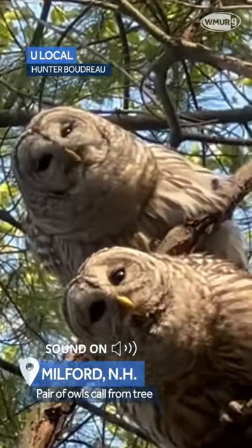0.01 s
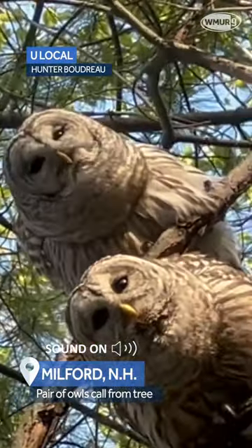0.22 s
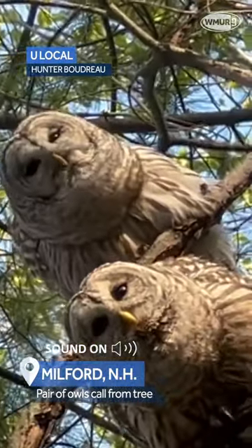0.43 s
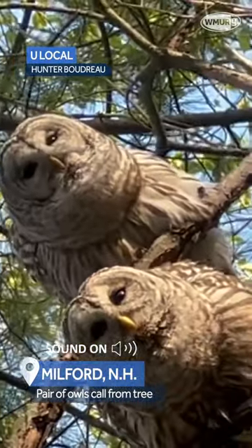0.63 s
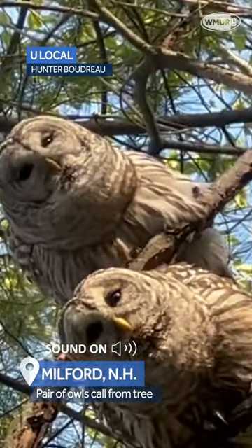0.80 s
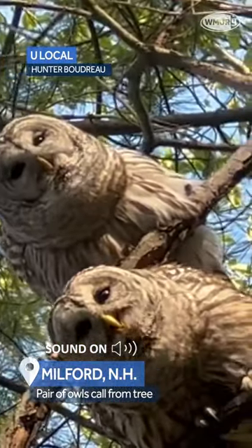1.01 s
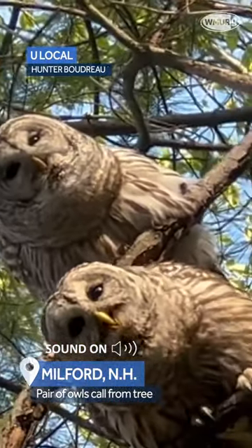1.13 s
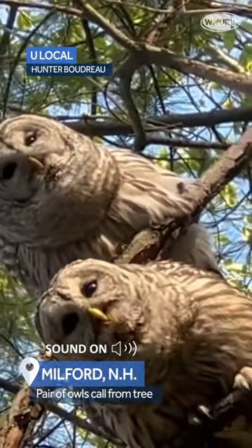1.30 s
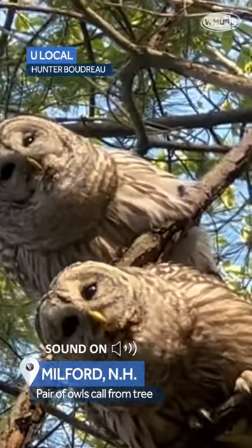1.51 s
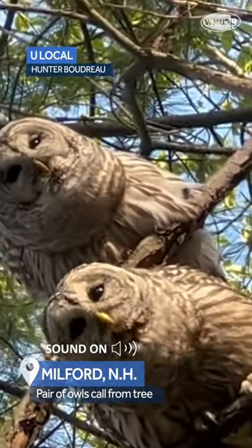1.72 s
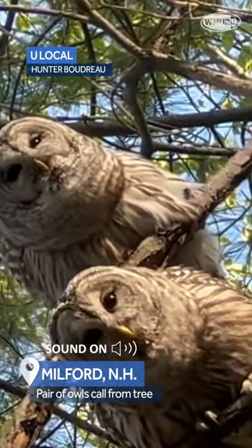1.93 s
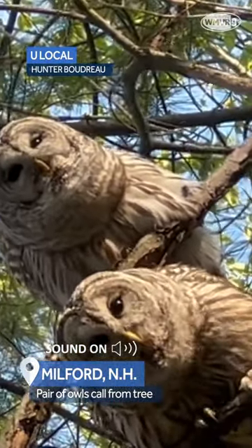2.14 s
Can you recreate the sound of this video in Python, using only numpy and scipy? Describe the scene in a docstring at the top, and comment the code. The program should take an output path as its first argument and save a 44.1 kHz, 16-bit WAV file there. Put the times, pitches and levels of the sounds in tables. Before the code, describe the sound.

Two barred owls call close by. From 0 a hollow, reedy call falls from about 650 Hz, quavering and loudest near 0.35, breaks lower around 0.5 and sinks away by 0.95. Gruff hoots arch at 0.5, 0.75, 1.2 and 1.65; a faint whine rises from 1.55, dropping into a hoot at 1.85, then a stronger overlapping pair at 2.0. Tiny click at 0.63, short tree echo, faint air.

```python
"""Two owls calling in the trees

Two barred owls call together, close by. A long, falling, quavering call breaks to a lower register, and a thin
whine rises and drops into a hoot: both are a sine fundamental with a fringe of overtones. Short gruff hoots
arch in pitch and sweep their harmonics through the throat resonance. Decaying noise scatters the calls among
the trees, over a few dry ticks, a click, a short low rumble and faint shaped-noise outdoor air."""
import sys
import numpy as np
from scipy import signal
from scipy.fft import rfft, irfft
from scipy.io import wavfile
from scipy.ndimage import uniform_filter1d

SR = 44100
rng = np.random.default_rng(int(sys.argv[2]) if len(sys.argv) > 2 else 0)


def generate_wav(signal):
    """Clip the signal to [-1, 1] and save it as 16-bit WAV at the path in sys.argv[1]."""
    frames = np.transpose(np.atleast_2d(signal))
    scaled = np.clip(frames, -1, 1) * 32767
    pcm = np.round(scaled).astype(np.int16)
    wavfile.write(sys.argv[1], SR, pcm)


N = 97020
T = np.arange(N) / SR
BIN_HZ = np.arange(N // 2 + 1) * SR / N
LEFT_RIGHT = np.array([[1], [-1]])  # sign of a difference signal in each channel


def undb(db):
    """Decibels to gain."""
    return 10 ** (np.asarray(db) / 20)


def curve_over_time(points):
    """Follow a (t/s, value) table with straight lines."""
    t, value = np.array(points).T
    return np.interp(T, t, value)


def gain_at(hz, points):
    """Gain of a (f/Hz, level/dB) curve, interpolated along log frequency."""
    f, db = np.array(points).T
    return undb(np.interp(np.log(np.maximum(hz, 1)), np.log(f), db))


def noise(shape):
    """Noise of rms 1 whose spectrum follows shape(Hz)."""
    x = irfft(rfft(rng.standard_normal(N)) * shape(BIN_HZ + 1), N)
    return x / x.std()


def band(hz, octaves):
    """Noise in a bell-shaped band."""
    return noise(lambda f: np.exp(-.5 * (np.log2(f / hz) / octaves) ** 2))


def waver(rate_hz):
    """Smooth random motion of spread 1."""
    return noise(lambda f: np.exp(-.5 * (f / rate_hz) ** 2))


def bump(centre_s, width_s):
    """Bell-shaped swell in time."""
    return np.exp(-.5 * ((T - centre_s) / width_s) ** 2)


def pan(x, db):
    """Place a sound between left and right; db is left minus right."""
    return x * undb(db * LEFT_RIGHT / 2)


def harmonics(hz, throat, rasp_db, order, count):
    """Throat-shaped harmonics from order up to count - 1, plus air noise puffed once a cycle; also the phase."""
    phase = 2 * np.pi * np.cumsum(hz) / SR
    tone = 0
    for k in range(order, count):
        audible = k * hz < SR / 2
        tone = tone + gain_at(k * hz, throat) * audible * np.sin(k * phase + rng.uniform(0, 2 * np.pi))
    puffs = 1 + np.cos(phase)
    throat_peak = gain_at(hz * 2, throat).max()
    air = noise(lambda f: gain_at(f, throat)) * puffs * throat_peak / 2
    return np.sqrt(2) * tone + undb(rasp_db) * air, phase


# throat in the long calls, sets each overtone by its frequency: f/Hz, level/dB
OPEN_THROAT = [(300, -61), (450, -29.5), (545, -14), (670, -34), (860, -41.5), (1000, -37.5), (1090, -63.5),
               (1280, -61), (1520, -53.5), (1700, -57.5), (1980, -54.5), (2200, -55), (2370, -45),
               (2520, -62.5), (2660, -84), (2830, -78), (3020, -63), (3270, -60.5), (3500, -64.5),
               (3880, -71.5), (4300, -95), (4800, -83.5), (5250, -69.5), (5700, -94), (6600, -82.5),
               (7200, -90), (7900, -70), (8400, -83.5), (9200, -102), (11000, -108), (14000, -106)]
# lift or cut of the treble in the long calls: t/s, level/dB
TREBLE_LIFT = [(0, -6), (.15, -3.5), (.24, 1), (.43, 8), (.5, 1), (.9, -11), (1.6, -12.5)]
TREBLE_HZ = 4070
QUAVER_HZ, QUAVER_DEPTH, QUAVER_DB = 26.47, 0.0089, 2.5  # mean rate; largest share of pitch; overtone swing


def long_call(table, jitter, rasp_db):
    """A sine fundamental with a reedy fringe of overtones; the pitch quaver deepens as the pitch falls."""
    s, hz, body_db, edge_db = np.array(table).T
    smooth = lambda x: uniform_filter1d(x, size=300)
    glide = lambda column: smooth(np.interp(T, s, column))
    gate = smooth(1. * ((T >= s[0]) & (T <= s[-1])))

    quaver = np.sin(2 * np.pi * np.cumsum(QUAVER_HZ * (1 + 0.13 * waver(6.9))) / SR)
    base_hz = glide(hz)
    fallen = 1 - base_hz / hz.max()
    pitch = base_hz * (1 + jitter * waver(110) + QUAVER_DEPTH * quaver * fallen)

    overtones, phase = harmonics(pitch, OPEN_THROAT, rasp_db, order=2, count=26)
    highpass = signal.butter(4, TREBLE_HZ, "high", fs=SR, output="sos")
    treble = signal.sosfiltfilt(highpass, overtones)
    overtones = overtones + treble * (undb(curve_over_time(TREBLE_LIFT)) - 1)

    body = np.sqrt(2) * np.sin(phase) * undb(glide(body_db))
    fringe = overtones * undb(glide(edge_db) + QUAVER_DB * quaver)
    return gate * (body + fringe)


# the three calls, each: t/s, f/Hz of the voice, level/dB of the fundamental, level/dB of the overtones
# long falling call
LONG_CALL = [(0, 625, -33.5, -3.5), (.025, 659.7, -43.5, 5), (.05, 657.8, -30, 1.5), (.095, 653.5, -27, 5),
             (.135, 627.6, -38, 6.5), (.165, 596.5, -28.5, 5), (.2, 597, -26, 10.5), (.235, 567, -15, 2.5),
             (.27, 559.5, -23, 7.5), (.3, 549.5, -13, 8), (.325, 555, -11, 8), (.348, 534.8, -11, 3.5),
             (.372, 526.3, -21.5, 1), (.398, 537, -12.5, 3.5), (.413, 494.8, -24, 2),
             (.425, 504.5, -15, -3.5), (.452, 538.3, -16.5, 4.5), (.466, 501.3, -17, -1),
             (.495, 482, -23, -27), (.51, 451, -55, 1)]
# its lower register, after the voice breaks
LOW_CALL = [(.455, 450.8, -57, -21), (.475, 442, -38, 3.5), (.5, 455.5, -33.5, -4),
            (.53, 418.4, -29.5, 7.5), (.555, 448.5, -43, -3.5), (.585, 416.3, -25.5, 5),
            (.605, 410.8, -38, 0), (.63, 433.7, -41.5, 4.5), (.655, 420.6, -25.5, 2), (.69, 421, -43.5, 2),
            (.72, 395, -25.5, 1.5), (.755, 405.2, -36, -1), (.78, 378.3, -28, -2), (.803, 379, -28.5, -9),
            (.83, 337, -30, -4), (.87, 335.6, -30, -10), (.905, 279.6, -66, -13.5),
            (.925, 256.3, -53, -15.5), (.943, 182.3, -63, -16.5), (.975, 158.5, -61, -55)]
# thin whine that rises, then drops into a hoot
WHINE = [(1.53, 445, -47.5, -24), (1.57, 506, -48.5, -21.5), (1.61, 593.3, -45.5, -22),
         (1.66, 622, -44, -17.5), (1.72, 624, -46, -11.5), (1.77, 632.8, -44, -4.5), (1.8, 626.5, -48, -1),
         (1.815, 592.6, -38.5, -8.5), (1.83, 537, -21, -7), (1.845, 520, -35, -33)]
CALL_JITTER, CALL_RASP_DB = 0.00099, -19.5  # pitch roughness as a share of pitch; breath in the overtones
LOW_JITTER, LOW_RASP_DB = 0.0087, -37.5


def all_calls():
    """The falling call, its broken lower register and the whine, all from the same voice mechanism."""
    falling = long_call(LONG_CALL, CALL_JITTER, CALL_RASP_DB)
    low = long_call(LOW_CALL, LOW_JITTER, LOW_RASP_DB)
    whine = long_call(WHINE, CALL_JITTER, CALL_RASP_DB)
    return falling + low + whine


# resonance of throat and bill in a hoot: f/Hz, level/dB
HOOT_THROAT = [(100, -17.5), (200, -4), (270, -23.5), (335, -0.5), (400, -6.5), (470, -2), (545, 6),
               (610, -0.5), (690, -11), (750, -15.5), (830, -11.5), (1000, -23), (1300, -31.5),
               (1700, -35.5), (2200, -31.5), (2800, -49), (3300, -53), (4200, -64), (8000, -44.5),
               (12000, -55.5)]
ARCH_SHAPE, ARCH_DROP = 1.8, 0.51  # how round the pitch arch is, and how far it sags at the hoot's edges
HOOT_EDGE_DB = -16.5  # loudness change one rise or fall away from the top
ATTACK_SHAPE, RELEASE_SHAPE = 3, 1.86  # steepness of each side
HOOT_JITTER, HOOT_SHIMMER, HOOT_RASP_DB = .032, .3, -19  # roughness of pitch, of loudness; breath
CRACK_HZ, CRACK_WIDTH_HZ, CRACK_JUMP = 292.2, 7.7, .15  # above this pitch the voice jumps up by this share
GRUNT_HZ, GRUNT_AFTER_S, GRUNT_S, GRUNT_DB = 124, .035, 0.051, -54  # soft low tone as each hoot dies


def hoot(top_s, rise_s, fall_s, top_hz, db):
    """Pitch and loudness arch together, a high enough top cracks upward, and a soft grunt ends it."""
    rising = T < top_s
    # distance from the top, counted in rises or falls
    away = np.minimum(np.abs(T - top_s) / np.where(rising, rise_s, fall_s), 4)

    arch_hz = top_hz / (1 + ARCH_DROP * away ** ARCH_SHAPE)
    crack = (1 + np.tanh((arch_hz - CRACK_HZ) / CRACK_WIDTH_HZ)) / 2
    hz = arch_hz * (1 + CRACK_JUMP * crack) * (1 + HOOT_JITTER * waver(82))

    voice, _ = harmonics(hz, HOOT_THROAT, HOOT_RASP_DB, order=1, count=14)
    loudness = undb(db + HOOT_EDGE_DB * away ** np.where(rising, ATTACK_SHAPE, RELEASE_SHAPE))
    shimmer = 1 + HOOT_SHIMMER * waver(53)

    grunt_tone = np.sin(2 * np.pi * np.cumsum(GRUNT_HZ * (1 + 0.04 * waver(23))) / SR)
    grunt = grunt_tone * bump(top_s + fall_s + GRUNT_AFTER_S, GRUNT_S)
    return voice * shimmer * loudness + undb(GRUNT_DB) * grunt


# hoots: t/s of the top, rise/s, fall/s, f/Hz of the top before any crack, level/dB
HOOTS = [(.522, 0.068, 0.041, 304.9, -31.5), (0.758, .062, 0.072, 281, -30),
         (1.226, 0.067, 0.065, 300.9, -30.5), (1.51, 0.053, .02, 277, -40),
         (1.636, 0.051, .062, 321.6, -30.5), (1.848, .017, 0.081, 303.9, -32.5),
         (2.024, .082, 0.086, 329.4, -27.5), (2.024, .05, 0.095, 272.8, -35)]


def all_hoots():
    """Every hoot from both birds, summed."""
    return sum(hoot(*row) for row in HOOTS)


TREES_T60_S, TREES_DB, TREES_DELAY_S, TREES_SIDE_DB = .24, -14, .012, -1
WOOD_T60_S, WOOD_DB = 1.0, -25.5  # faint long return from the wider wood


def trees(x):
    """Decaying noise echoes: a short diffuse tail from nearby trunks and branches, a faint long one from the wood."""
    def decay(t60):
        env = np.exp(-np.log(1000) * T / t60) * (T > TREES_DELAY_S)
        return env / np.sqrt(np.sum(env ** 2))

    tail = np.hypot(undb(TREES_DB) * decay(TREES_T60_S), undb(WOOD_DB) * decay(WOOD_T60_S))
    mid, side = (signal.fftconvolve(x, tail * rng.standard_normal(N))[:N] for _ in range(2))
    return mid + undb(TREES_SIDE_DB) * side * LEFT_RIGHT


# small dry ticks: t/s, length/s, f/Hz of the centre, width/octaves, level/dB
TICKS = [(0.421, .002, 7820, 0.055, -49.5), (0.516, 0.0058, 6500, 0.25, -55)]
CLICK_S, CLICK_DB, CLICK_DECAY_S = .632, -26, .00005


def ticks():
    """Brief bursts of band noise, and one sharp click with an exponential decay."""
    soft = sum(band(hz, octaves) * undb(db) * bump(s, length) for s, length, hz, octaves, db in TICKS)
    since = T - T[np.searchsorted(T, CLICK_S)]
    click = (since >= 0) * np.exp(-np.abs(since) / CLICK_DECAY_S)
    return soft + undb(CLICK_DB) * click


# spectrum of the outdoor air: f/Hz, level/dB (relative density per Hz)
AIR = [(25, -23), (55, 0), (90, -8.5), (125, 3), (170, -8.5), (280, -14), (400, -10.5), (550, -13),
       (800, -12.5), (1200, -17), (1650, -12), (2200, -22.5), (2750, -32), (4000, -34.5), (7000, -33.5),
       (8200, -33), (9000, -45), (15500, -40)]
# how much the air differs between left and right: f/Hz, level/dB (gain of the side noise)
AIR_SIDE = [(50, -15), (500, -21.5), (900, -4.5), (1400, 6.5), (2300, -4), (8000, -22), (12000, -20)]
AIR_DB = -53
RUMBLE_S, RUMBLE_END_S, RUMBLE_HZ, RUMBLE_DB = 1.123, 1.36, 55.2, -55.5


def background():
    """Steady outdoor air as wide shaped noise, and a short low rumble of band noise."""
    mid, side = (noise(lambda f: gain_at(f, AIR)) for _ in range(2))
    side = irfft(rfft(side) * gain_at(BIN_HZ, AIR_SIDE), N)
    air = mid + side * LEFT_RIGHT
    rumble_gate = uniform_filter1d(1. * ((T > RUMBLE_S) & (T < RUMBLE_END_S)), size=1500)
    rumble = band(RUMBLE_HZ, 0.83) * rumble_gate
    return undb(AIR_DB) * air + undb(RUMBLE_DB) * rumble


# balance of the long calls: t/s, level/dB (left minus right)
CALL_PAN = [(.2, 4), (.3, 0.9), (1.7, 2.5)]
HOOT_PAN_DB = 1.4


def scene():
    """Both owls among the trees, with ticks and outdoor air."""
    calls = all_calls()
    hoots = all_hoots()
    owls = pan(calls, curve_over_time(CALL_PAN)) + pan(hoots, HOOT_PAN_DB)
    return owls + trees(calls + hoots) + ticks() + background()


def record(dry):
    """The recorder cuts the top with a steep elliptic low-pass."""
    lowpass = signal.ellip(10, .2, 80, 15750, fs=SR, output="sos")  # ripple/dB, stopband/dB, edge/Hz
    return signal.sosfilt(lowpass, dry)


dry = scene()
out = record(dry)
generate_wav(out)
```